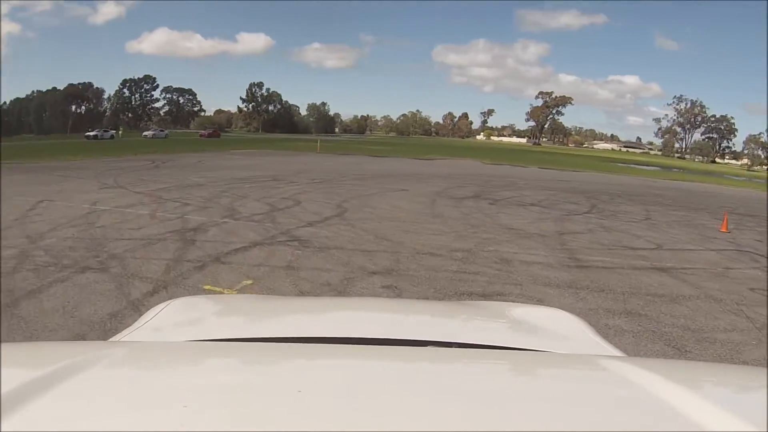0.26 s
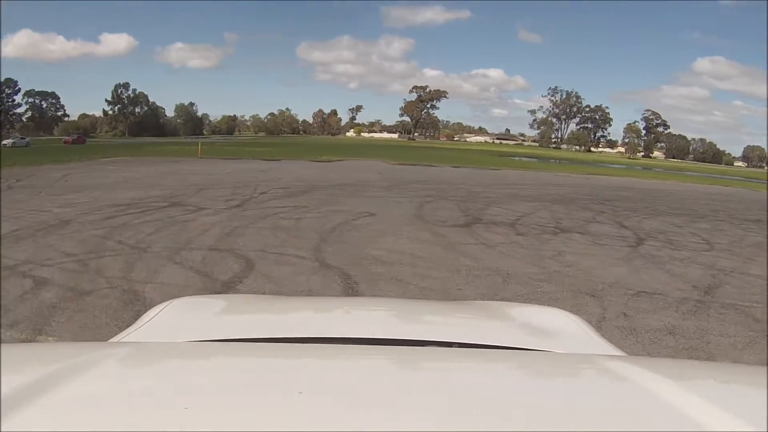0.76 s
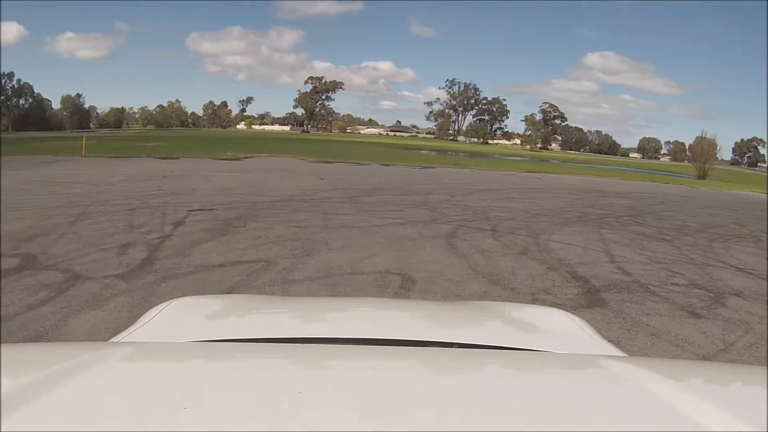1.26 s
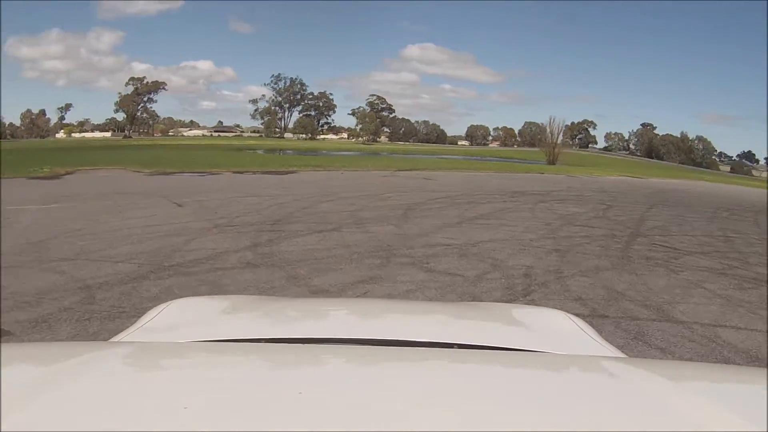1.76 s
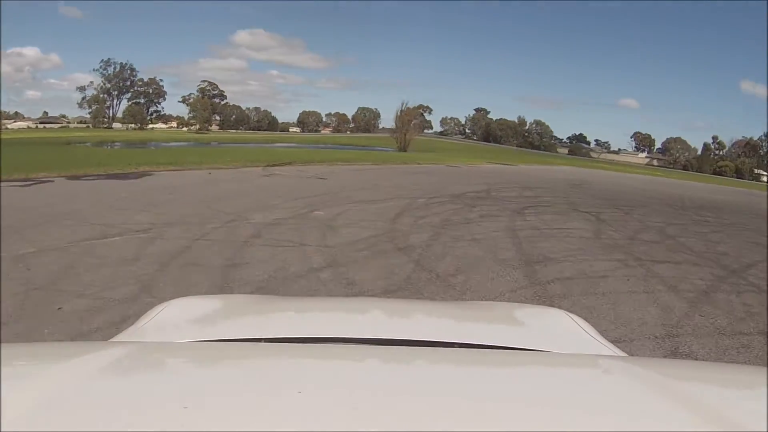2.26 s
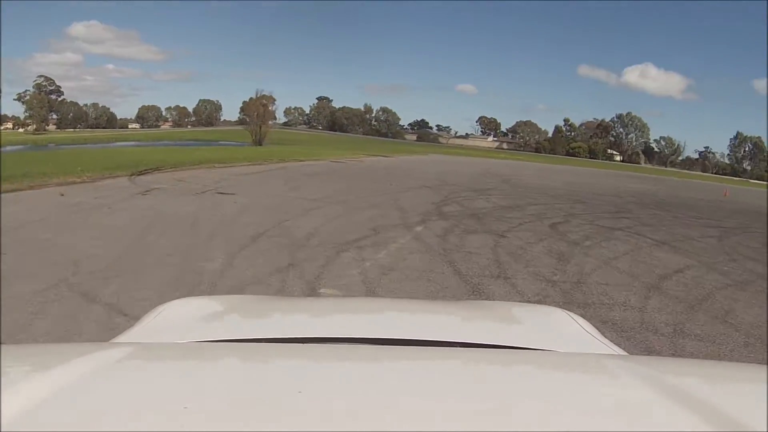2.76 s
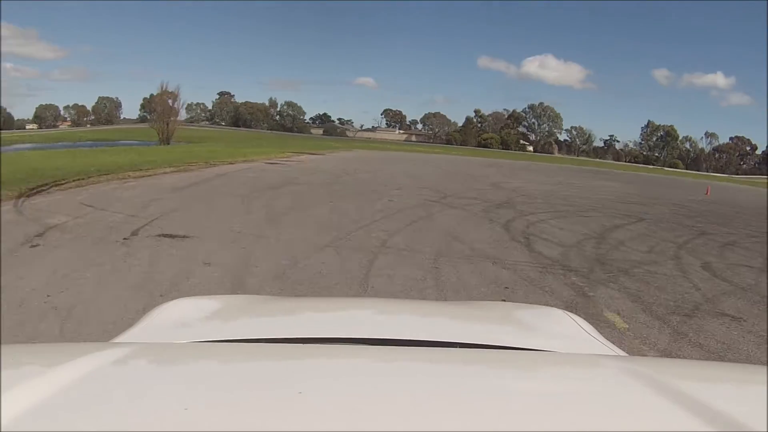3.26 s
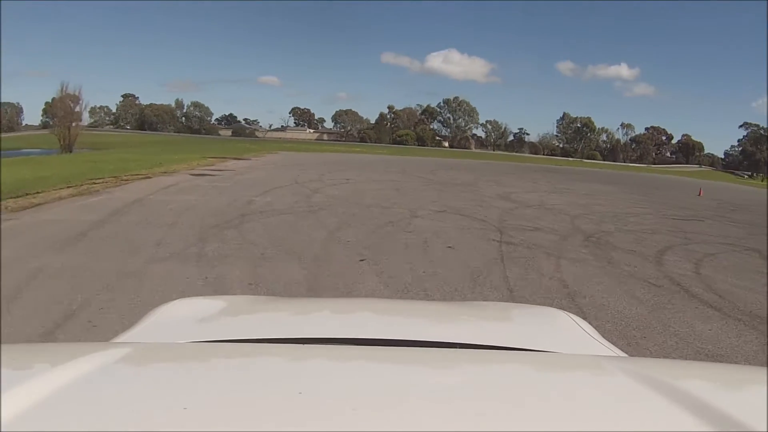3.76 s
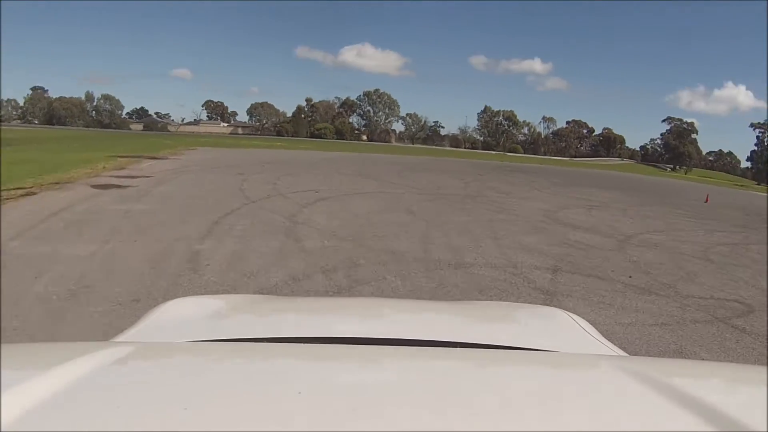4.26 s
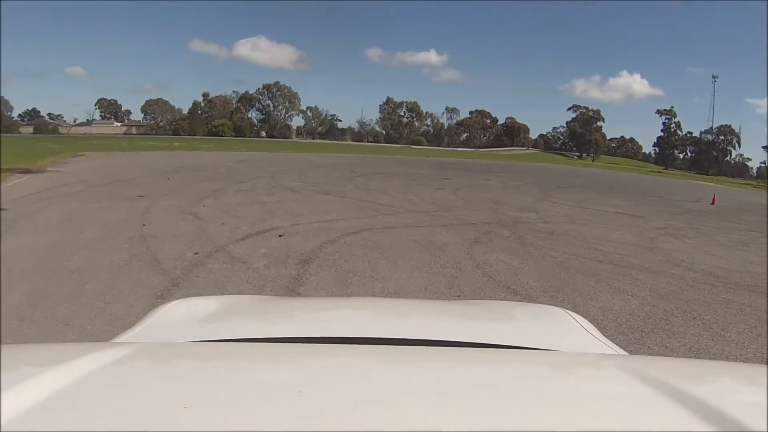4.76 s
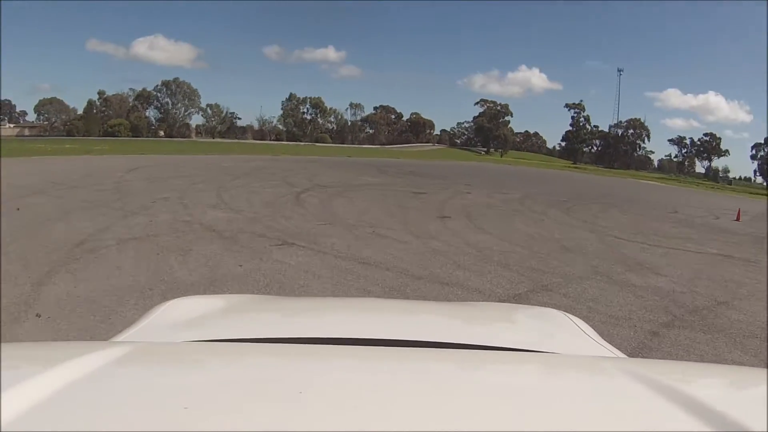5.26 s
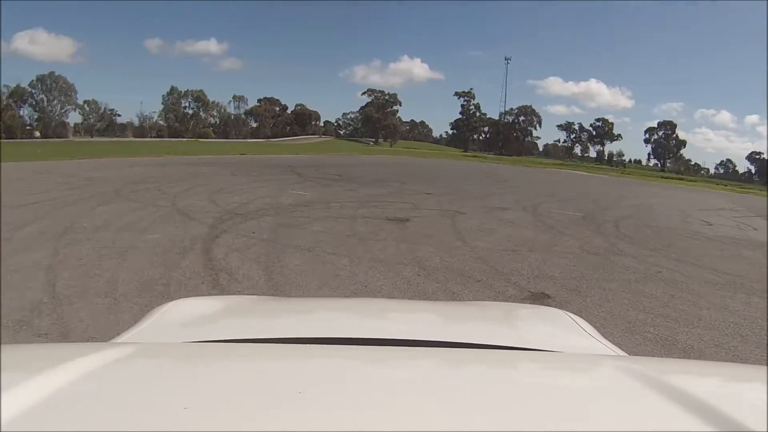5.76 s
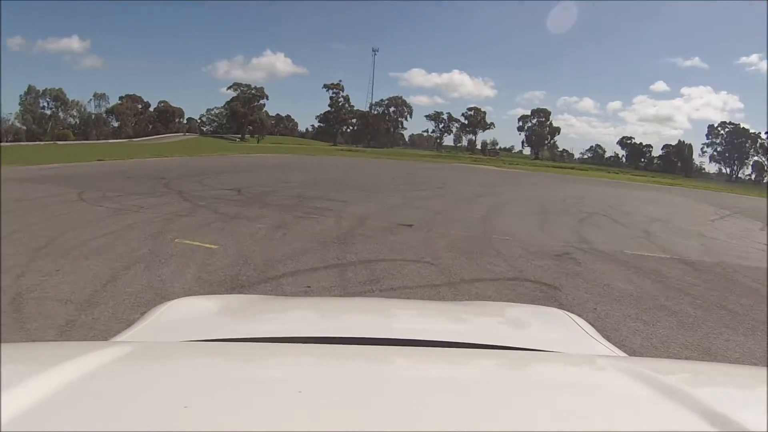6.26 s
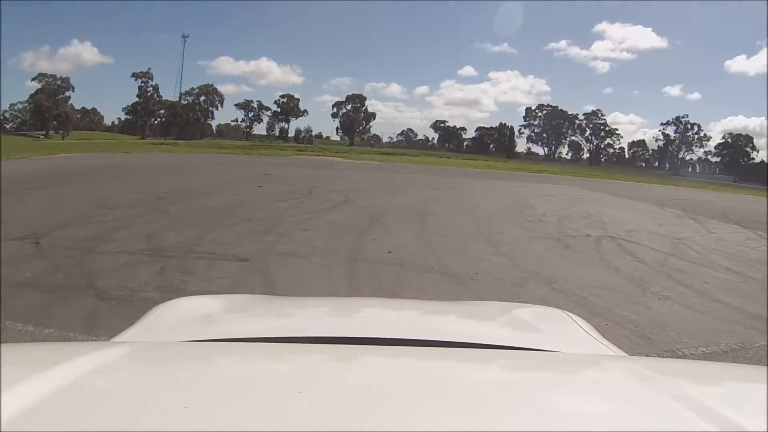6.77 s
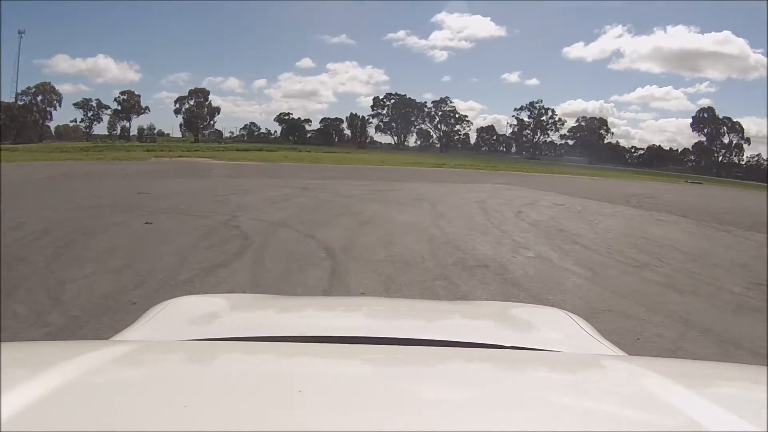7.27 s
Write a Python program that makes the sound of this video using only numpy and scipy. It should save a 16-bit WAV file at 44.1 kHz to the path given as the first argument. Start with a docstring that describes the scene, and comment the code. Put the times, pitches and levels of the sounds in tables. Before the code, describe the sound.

A drifting car's deep engine surges up and down over harsh sliding tyres, later easing to roar, squeal and a faint loose-part buzz.

```python
"""First a V8 engine growls over scrubbing, ringing tyres: a car drifts on asphalt, heard from a camera on its body.
Throttle blips raise the firing note, a sine that booms near the body's resonance; exhaust lines and gas noise rasp.
The tyres roar, scrub, hiss, squeal and throw sand: all shaped noise, as are the rumbling panels and the airstream.
Stones tick as short noise bursts, and from halfway a loose part buzzes, knocked about by the firings.
The camera's limiter turns everything down at the peaks, so a boom ducks the tyres."""
import sys
import numpy as np
from scipy import signal
from scipy.fft import rfft, irfft, next_fast_len
from scipy.io import wavfile
from scipy.ndimage import uniform_filter1d, minimum_filter1d, map_coordinates

SR = 44100
rng = np.random.default_rng(int(sys.argv[2]) if len(sys.argv) > 2 else 0)


def to_wav(sig):
    """Store sig (one row per channel, or 1-D mono) as 16-bit WAV at the path in sys.argv[1].

    Samples outside -1..1 are clipped; the rate is SR.
    """
    pcm = np.clip(np.atleast_2d(sig), -1, 1) * 32767
    pcm = np.round(pcm).astype(np.int16)
    wavfile.write(sys.argv[1], SR, pcm.T)  # frames by channels


N = 330750  # length in samples

# Levels in the tables are relative: later gains and the limiter still act on them.
# throttle blips: pedal down t/s, firing rate then f/Hz, pedal up t/s, firing rate then f/Hz,
# bend of the climb (over 1 starts slowly), bend of the fall (over 1 drops fast at first), strength level/dB
THROTTLE_BLIPS = [(0.0, 136.8, 0.14, 139.9, 0.98, 1.56, 1.5), (1.21, 120.7, 1.72, 151.4, 0.58, 1.14, -2.5),
                  (3.02, 106.9, 3.46, 151.1, 0.7, 2.1, 0), (3.82, 134.2, 4.23, 165.7, 0.74, 2.06, -1.5),
                  (4.76, 115.4, 5.2, 156.8, 1.19, 1.58, -1.5), (5.6, 123.0, 6.1, 174.8, 1.41, 1.16, -1),
                  (6.64, 112.0, 7.52, 139.6, 3.05, 0.99, 0)]
# how the body booms at each firing rate: f/Hz, level/dB
BODY_BOOM = [(108, -38), (122, -34), (130, -28.5), (138, -23), (144, -16), (149, -10.8), (156, -10),
             (160, -15.5), (164, -26), (173, -32)]
# exhaust lines under load: multiple of crank speed, level/dB
EXHAUST_LINES = [(3, 2), (5, 1.5), (5.5, -6), (6, 1), (7, -6.5), (7.5, -4.5), (8, 6), (8.5, -6.5), (10, -8),
                 (11.5, -1), (12, 2), (15, -5.5), (16, -1), (16.5, -0.5), (18.5, -6), (20, 0), (20.5, -3.5),
                 (23, -4.5), (24, -1.5), (26, -7.5)]
# path from the tailpipe through the body: f/Hz, level/dB
TAILPIPE_PATH = [(60, 2.5), (185, 5.5), (212, -7), (248, 3), (282, 3), (308, -1), (385, 0), (450, -4),
                 (580, -1), (700, 2.5), (850, -4.5), (1300, -12)]
# shaking by the uneven cylinders, between the firing lines: multiple of crank speed, level/dB
LOPE_ORDERS = [(2, -6.5), (2.5, -0.5), (3, -0.5), (3.5, 0), (4.5, -9.5), (5, -4.5)]
# resonances of the body panels: f/Hz, width f/Hz, level/dB
BODY_PANELS = [(58.6, 20, -15), (92.4, 13.7, -0.5), (106.7, 14.5, -8), (128, 35, -8), (155.7, 7.6, 3),
               (183, 31.3, -17.5), (260, 27, -20), (278.6, 8.3, -16.5)]
# rough stretches of asphalt: start t/s, end t/s, level/dB
ROUGH_STRETCHES = [(.1, 1.55, -41), (4.9, 5.2, -34), (6.52, 6.66, -41), (6.84, 7.4, -28)]
# spectrum of the airstream: f/Hz, level/dB
WIND_SPECTRUM = [(8, -8), (16, 0), (26, -6), (40, -17), (60, -22), (110, -45)]
# gusts on the camera: start t/s, end t/s, level/dB
WIND_GUSTS = [(.15, .4, -37), (2.55, 2.85, -36), (4.8, 5.3, -46), (6.12, 6.3, -26.5)]
# spectrum of the tread roar: f/Hz, level/dB
ROAR_SPECTRUM = [(150, -26), (230, -8), (340, -3), (450, -7.5), (530, -4), (600, -9), (720, -2.5),
                 (950, -5), (1200, -3), (1500, -6.5), (1780, -7.5), (1900, -9), (2400, -23.5), (4000, -27)]
# spectrum of rubber rubbing on asphalt: f/Hz, level/dB
SCRUB_SPECTRUM = [(700, -27), (1500, -5), (1750, 2), (2100, -3), (3100, -4.5), (3350, 2), (3900, -6.5),
                  (4150, -12), (4800, -14.5), (5200, -19.5), (5700, -16.5), (6000, -22), (6400, -18),
                  (8000, -28), (9200, -44)]
# how hard the tyres rub sideways: t/s, level/dB
SIDEWAYS_RUB = [(0.0, -32), (0.29, -27), (1.36, -22.5), (1.88, -31), (3.13, -38), (3.7, -36), (4.05, -37.5),
                (4.66, -34), (5.41, -39), (5.83, -35.5), (6.06, -38.5), (6.12, -38), (6.43, -44.5),
                (6.75, -41.5), (7.5, -47.5)]
# hard slide, in which the rubber bites and rings: start t/s, end t/s, share that rings level/dB
HARD_SLIDES = [(-.7, 2.04, -1.5)]
# ring of a hard slide: f/Hz, width f/Hz, level/dB
SLIDE_MODES = [(1733, 130, -7), (2400, 1150, -14.5), (3385, 240, 0), (3610, 240, -4), (3860, 220, -7.5),
               (4780, 350, -25), (5610, 190, -18), (6270, 190, -22), (6530, 190, -22), (7580, 550, -29),
               (8150, 400, -33), (9550, 600, -46), (10450, 380, -38)]
# spectrum of the tyre hiss and the coarser grit: f/Hz, level/dB
HISS_SPECTRUM = [(3000, -31), (4500, 1.5), (7000, 4), (8600, 8.5), (9700, 4), (11700, 0), (13000, -5),
                 (15000, -13)]
# tread stick-slip tones and, last, their hoarse skirt: f/Hz, width f/Hz, level/dB
SQUEAL_MODES = [(1107, 16, 0), (1145, 24, -5), (1195, 50, -7), (1254, 40, -5), (1130, 900, -15)]
# spells in which the tread squeals: start t/s, end t/s, level/dB
SQUEAL_SPELLS = [(0, 1.2, -46.5), (2.25, 2.65, -38.5), (2.7, 3.1, -39), (3.2, 3.9, -41), (4.4, 5.05, -40.5),
                 (6.62, 7.5, -38.5)]
# patches of loose sand under the tyres: start t/s, end t/s, level/dB
SAND_PATCHES = [(1.15, 1.55, -79), (1.75, 2.0, -71), (2.06, 2.36, -59.5), (4.22, 4.36, -62),
                (4.4, 5.03, -70), (6.8, 7.15, -80)]
# stones ticking on the body: t/s, peak level/dB
STONE_TICKS = [(.148, -46), (2.358, -38), (2.575, -41), (2.711, -36), (2.908, -39), (2.99, -38),
               (3.019, -47), (4.79, -50), (5.155, -43), (6.922, -42), (7.085, -47)]
# resonances of the loose part: f/Hz, width f/Hz, level/dB
LOOSE_PART_MODES = [(6400, 1100, -2.5), (7100, 840, 2), (8700, 850, -4.5)]
# spells in which the loose part rattles: start t/s, end t/s, level/dB
RATTLE_SPELLS = [(3.78, 3.88, -57), (6.51, 6.75, -58), (6.83, 7.13, -53), (7.23, 7.38, -57)]
# dead spots of the camera housing: f/Hz, width f/Hz, level/dB
HOUSING_DIPS = [(430, 30, -3), (1350, 60, -3), (1910, 70, -4), (4220, 170, -5), (5950, 110, -7),
                (6870, 130, -3), (8850, 220, -2)]

FLYWHEEL_S = .15  # span over which the turns of the revs are rounded
# the engine is under load while it gains speed; the pedal moves just ahead of the revs
FULL_LOAD_HZ_PER_S, PEDAL_LEAD_S, COAST_DB = 88, 0.033, -10.5
RASP_DB_PER_HZ, CRUISE_HZ = 0.0871, 137  # the exhaust grows louder with the firing rate
# louder at full load; the body is slow to follow pitch, and slower to follow load
BOOM_LOAD_DB, BOOM_LAG_S, BOOM_HANG_S = 4, 0.0092, 0.024
CEILING_DB, HOLD_S, LIMITER_ATTACK_S = -6.8, .045, .014  # the camera's limiter
TOP_HZ = 15200  # the camera passes nothing above this


def amp(db):
    """Turn decibels into gain."""
    return 10 ** (np.asarray(db) / 20)


def unit(x):
    """Scale to rms 1."""
    return x / np.sqrt(np.mean(x ** 2) + 1e-20)


def noise():
    """White noise."""
    return rng.standard_normal(N)


def wobble(rate):
    """A smooth random curve through rate new values a second."""
    knots = rng.standard_normal(int(N * rate / SR) + 4)
    return map_coordinates(knots, [np.arange(N) * rate / SR])


def curves(rows):
    """One value per sample for each column after the time."""
    times, *columns = np.transpose(rows)
    return [np.interp(np.arange(N) / SR, times, column) for column in columns]


def shifted(curve, delay_s):
    """The same curve, later by delay_s."""
    t = np.arange(N) / SR
    return np.interp(t - delay_s, t, curve)


def spells(rows, fade_s, steady_db=-120):
    """Gain of (start, end, dB) spells that fade in and out, over a steady level."""
    t = np.arange(N) / SR
    power = amp(steady_db) ** 2
    for start, end, db in rows:
        # each fade is halfway at the start or end time
        gate = np.clip(np.minimum(t - start, end - t) / fade_s + .5, 0, 1)
        power = power + (amp(db) * gate) ** 2
    return np.sqrt(power)


def filtered(x, response):
    """x times a response of frequency, its ends mirrored so that they do not click."""
    edge = SR // 4
    x = np.pad(x, [(0, 0)] * (x.ndim - 1) + [(edge, edge)], mode="reflect")
    size = next_fast_len(x.shape[-1], real=True)
    spectrum = rfft(x, size) * response(np.fft.rfftfreq(size, 1 / SR))
    return irfft(spectrum, size)[..., edge:edge + N]


def coloured(x, points):
    """x shaped by (Hz, dB) points, at rms 1."""
    f, db = np.transpose(points)

    def response(hz):
        return amp(np.interp(np.log(hz + 1), np.log(f), db, left=-120, right=-120))
    return unit(filtered(x, response))


def resonant(x, modes):
    """x through steep-sided (Hz, width, dB) resonances, at rms 1."""
    def response(hz):
        return np.sqrt(sum(amp(db) ** 2 / (1 + (2 * (hz - centre) / width) ** 4)
                           for centre, width, db in modes))
    return unit(filtered(x, response))


def revs():
    """Firing rate in Hz: each blip drives it up, then it falls until the next; the flywheel rounds the turns."""
    t = np.arange(N) / SR

    def progress(start, end):
        return np.clip((t - start) / (end - start), 0, 1)

    rate = np.full(N, float(THROTTLE_BLIPS[0][1]))
    for down, low, up, top, climb, fall, db in THROTTLE_BLIPS:
        rate += (top - low) * progress(down, up) ** climb
    for blip, following in zip(THROTTLE_BLIPS, THROTTLE_BLIPS[1:]):
        down, low, up, top, climb, fall, db = blip
        next_down, next_low, *_ = following
        rate -= (top - next_low) * (1 - (1 - progress(up, next_down)) ** fall)
    size = int(FLYWHEEL_S * SR / 2)
    running_on = np.pad(rate, size, mode="reflect", reflect_type="odd")
    # two averages of half the span each
    return uniform_filter1d(uniform_filter1d(running_on, size), size)[size:-size]


def throttle(rate):
    """Load 0-1, in proportion to how fast the revs are about to climb."""
    climb_hz_per_s = shifted(np.gradient(rate) * SR, -PEDAL_LEAD_S)
    return np.clip(climb_hz_per_s / FULL_LOAD_HZ_PER_S, 0, 1)


def strength():
    """Each blip keeps its own strength in dB until the next, with the steps smoothed."""
    downs, *_, db = np.transpose(THROTTLE_BLIPS)
    current = np.maximum(np.searchsorted(downs, np.arange(N) / SR) - 1, 0)
    return uniform_filter1d(db[current], SR // 5, mode="nearest")


def engine(crank, rate, jitter=0.007, flutter=0.37, rasp_db=-33, second_db=-39, rush_db=-43.0):
    """The booming firing note, the exhaust lines of eight uneven cylinders and the rush of their gas."""
    load = throttle(rate)
    load_db = COAST_DB * (1 - load)
    angle = 2 * np.pi * crank

    note = np.sqrt(2) * np.sin(4 * angle)  # four firings a turn
    boom_db = np.interp(shifted(rate, BOOM_LAG_S), *np.transpose(BODY_BOOM))
    boom_db = boom_db + BOOM_LOAD_DB * shifted(load, BOOM_HANG_S)
    boom = amp(boom_db + 0.6 * wobble(24)) * note

    # the octave of the firing note stands out only as it crosses the highest panel resonance
    octave = resonant(np.sin(8 * angle), BODY_PANELS[-1:])
    octave = amp(second_db + load_db + 1.6 * wobble(24)) * octave

    # no two firings are alike, so every line flutters in strength and they share a shaky timing
    shaky = angle + jitter * wobble(40)
    lines = np.zeros(N)
    for multiple, db in EXHAUST_LINES:
        # an open throttle sharpens the exhaust pulses: high lines gain most
        gain = amp(db + .05 * (multiple - 8) * load_db)
        phase = rng.uniform(0, 2 * np.pi)
        lines += gain * (1 + flutter * wobble(22)) * np.sin(multiple * shaky + phase)
    rasp = amp(rasp_db) * coloured(lines, TAILPIPE_PATH)

    # the gas rushes in time with the firing note
    rush = amp(rush_db) * coloured((1 + note / 2) * noise(), TAILPIPE_PATH[3:])
    exhaust = amp(load_db + RASP_DB_PER_HZ * (rate - CRUISE_HZ)) * (rasp + rush)
    return amp(strength()) * (boom + octave + exhaust)


def lope(crank, lope_db=-32.0, flutter=0.66):
    """Low crank orders beat against each other in the body panels."""
    orders = np.zeros(N)
    for multiple, db in LOPE_ORDERS:
        phase = rng.uniform(0, 2 * np.pi)
        orders += amp(db) * (1 + flutter * wobble(25)) * np.sin(2 * np.pi * multiple * crank + phase)
    return amp(lope_db + strength()) * resonant(orders, BODY_PANELS)


def road(rumble_db=3.5, evenness=0.41):
    """Road and driveline shake the body panels; the airstream buffets the camera."""
    panels = resonant(noise(), BODY_PANELS)
    # the shaking throbs quickly, but its slower swings in level are partly evened out
    swell = np.abs(uniform_filter1d(panels ** 2, SR // 6)) + 1e-6
    panels = unit(panels / swell ** (evenness / 2))
    shake = amp(rumble_db + 1.3 * wobble(7)) * spells(ROUGH_STRETCHES, fade_s=0.05, steady_db=-31)
    airstream = spells(WIND_GUSTS, fade_s=0.17, steady_db=-37) * amp(1.4 * wobble(3.3))
    return shake * panels + airstream * coloured(noise(), WIND_SPECTRUM)


def tyres(roar_db=-39.0, hiss_db=-25.0, smear_db=-14):
    """Tread roar, grainy scrub that rings in a hard slide, stick-slip squeal and sprayed grit."""
    rub_db, = curves(SIDEWAYS_RUB)
    bite = np.clip(spells(HARD_SLIDES, fade_s=0.77, steady_db=-20.5), 0, 1)
    grip_db = 1.04 * wobble(7.4)  # the asphalt is uneven
    grain = amp(.9 * wobble(350) + .4 * wobble(25))
    roar = amp(roar_db + 0.23 * wobble(8)) * coloured(noise(), ROAR_SPECTRUM)
    scrub = np.sqrt(1 - bite) * coloured(grain * noise(), SCRUB_SPECTRUM)
    ring = np.sqrt(bite) * resonant(grain * noise(), SLIDE_MODES)
    # biting rubber smears on the asphalt and sprays less grit
    grit = coloured(noise() * amp(2.2 * wobble(900)), HISS_SPECTRUM)
    hiss = amp(hiss_db + smear_db * bite ** 2 + 1.5 * wobble(8.9)) * grit
    return roar + amp(rub_db + grip_db) * (scrub + ring + hiss) + squeal() + spray()


def squeal(waver=0.004):
    """The tread sticks and slips: noise rings at its tones, and the pitch wavers with the grip."""
    clock = np.cumsum(1 + waver * wobble(14))  # uneven reading speed bends the pitch
    tones = map_coordinates(resonant(noise(), SQUEAL_MODES), [clock], mode="reflect")
    return spells(SQUEAL_SPELLS, fade_s=0.18, steady_db=-44) * amp(0.58 * wobble(11)) * tones


def spray(coarse_db=3):
    """Fine sand sizzles on the wheel arches, most in the loose patches; coarser grit hisses below it."""
    fine = resonant(noise() * amp(2.4 * wobble(900)), [(11700, 1900, 0)])
    coarse = amp(coarse_db) * coloured(noise() * amp(2.4 * wobble(900)), HISS_SPECTRUM)
    return spells(SAND_PATCHES, fade_s=.15, steady_db=-80.5) * (fine + coarse)


def stones(life_s=0.002):
    """Single stones tick against the body: bright noise bursts that fall 60 dB in life_s."""
    t = np.arange(SR // 50) / SR
    band = signal.butter(2, [10800, 14500], "band", fs=SR, output="sos")
    out = np.zeros(N + SR)
    for start, db in STONE_TICKS:
        burst = rng.standard_normal(len(t)) * amp(-60 * t / life_s)
        tick = signal.sosfilt(band, burst)
        out[round(start * SR):][:len(t)] += amp(db) * tick / np.abs(tick).max()
    return out[:N]


def buzz(crank):
    """A loose part chatters, knocked about once for each firing, at slightly shaky times."""
    knocks = np.diff(np.floor(4 * crank + .22 * wobble(70)), prepend=0) > 0
    t = np.arange(SR // 60) / SR
    fading = amp(-60 * t / .018)  # falls at 60 dB in 18 ms
    contacts = signal.fftconvolve(knocks * amp(2.3 * noise()), fading)[:N]
    return spells(RATTLE_SPELLS, fade_s=.06) * resonant(contacts * noise(), LOOSE_PART_MODES)


def limited(x):
    """Peaks over the ceiling turn everything down for a moment, so the tyres duck under each boom."""
    needed = np.minimum(1, amp(CEILING_DB) / (np.abs(x) + 1e-9))
    hold, attack = int(HOLD_S * SR), int(LIMITER_ATTACK_S * SR)
    held = minimum_filter1d(needed, hold + attack, origin=(hold - 1) // 2)
    return x * uniform_filter1d(held, attack)


def scene():
    """Everything rides on the same car; the crank turns once in four firings."""
    rate = revs()
    crank = np.cumsum(rate) / SR / 4  # turns so far
    mix = engine(crank, rate) + lope(crank) + road() + tyres() + stones() + buzz(crank)
    return mix[None]


def record(dry):
    """The housing swallows a few narrow bands; the camera limits the peaks and cuts off the top."""
    def housing(hz):
        return amp(sum(db * np.exp(-((hz - centre) / width) ** 2) for centre, width, db in HOUSING_DIPS))

    def band_limit(hz):
        return np.clip((TOP_HZ - hz) / 100, 0, 1)

    housed = filtered(dry, housing)
    soft_ends = signal.windows.tukey(N, .001)
    return filtered(limited(housed) * soft_ends, band_limit)


dry = scene()
out = record(dry)
to_wav(out)
```